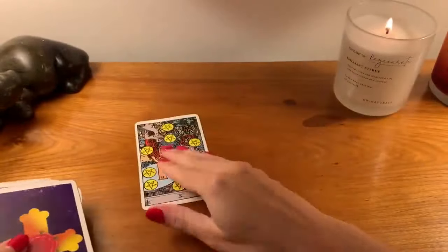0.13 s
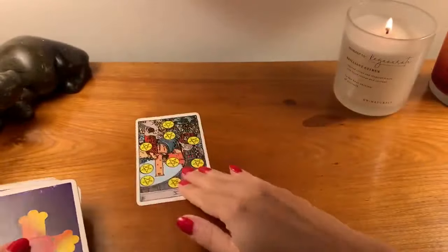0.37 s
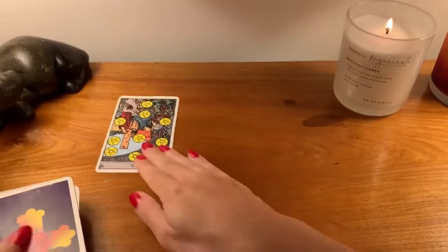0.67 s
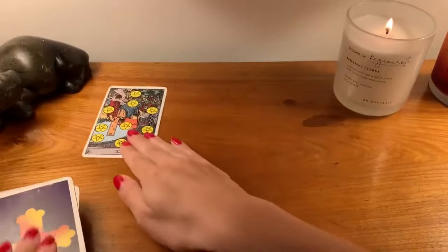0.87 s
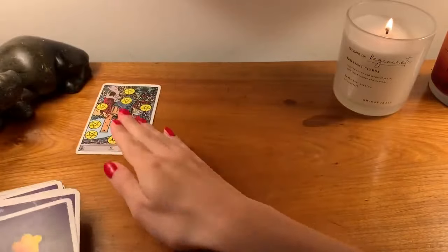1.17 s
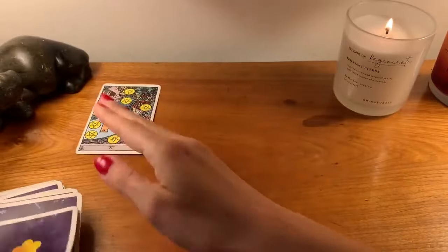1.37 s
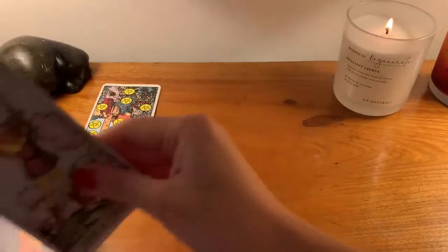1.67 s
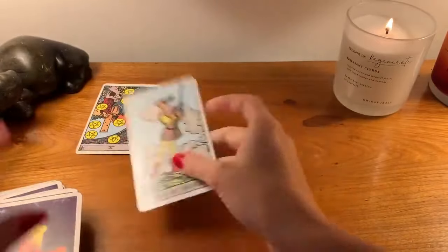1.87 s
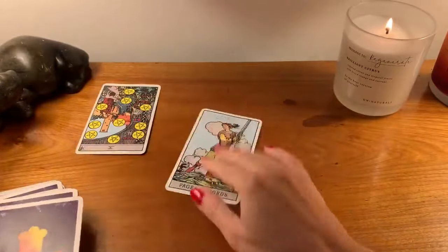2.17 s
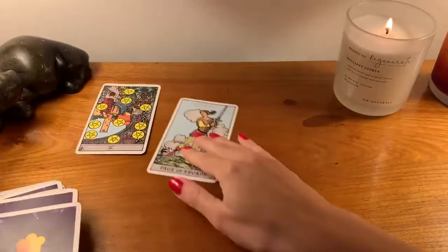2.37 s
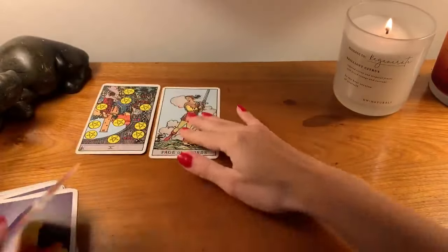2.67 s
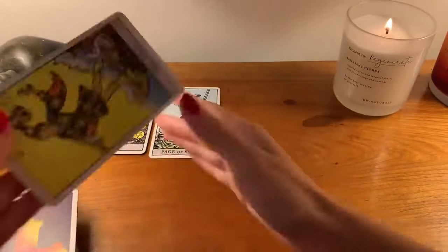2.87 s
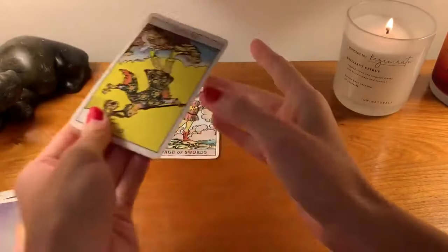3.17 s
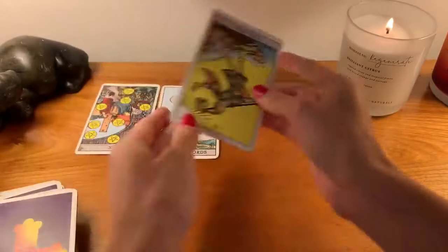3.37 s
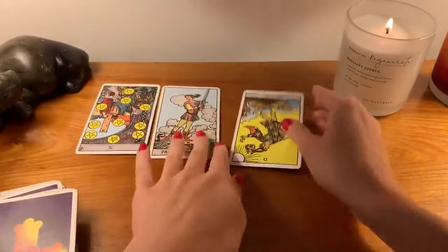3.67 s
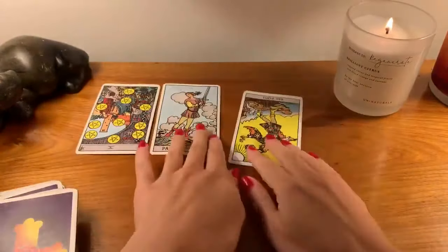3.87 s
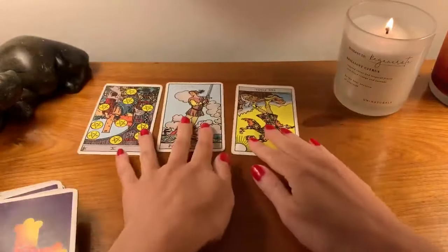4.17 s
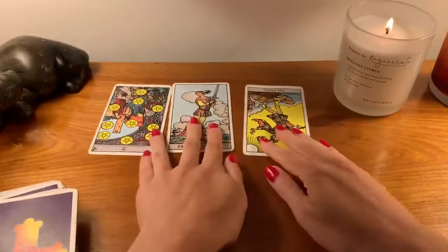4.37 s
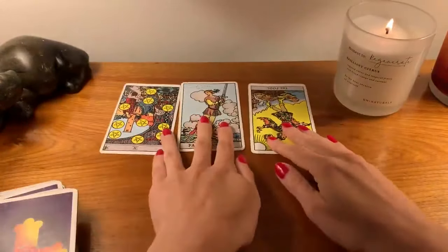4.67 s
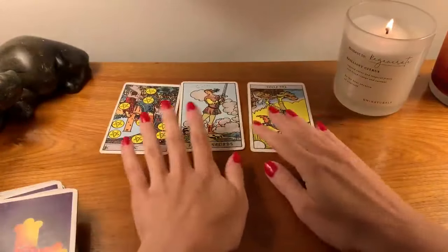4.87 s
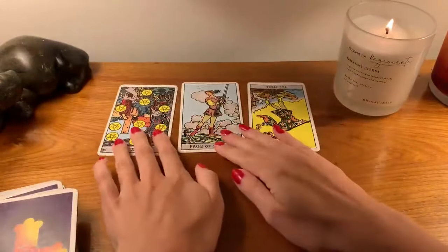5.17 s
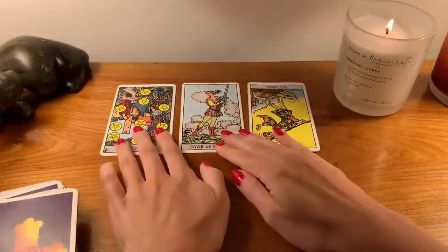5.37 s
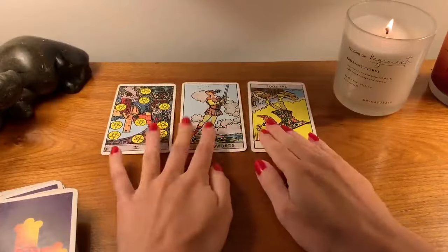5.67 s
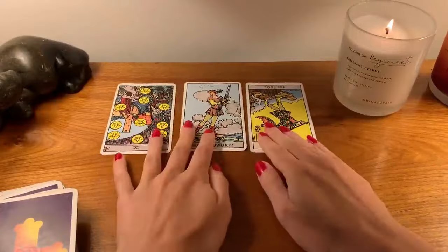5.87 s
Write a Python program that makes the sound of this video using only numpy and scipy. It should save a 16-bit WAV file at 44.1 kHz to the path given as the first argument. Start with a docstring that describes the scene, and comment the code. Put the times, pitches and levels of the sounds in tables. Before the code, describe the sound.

Close, dry card flicks and swishes over wood, one deep knock early on, then quiet fingertip rubbing and faint rumbles in a hushed room.

```python
"""Cards pushed on a wooden table

Three cards are drawn from a deck, laid on a wooden table and pushed into line by fingertips, near a phone.
Friction noise in three bands makes the scrapes and a narrow whistle; noise bursts make the edge snaps,
and short decaying tones the ticks. Damped modes of the table boom under blows and rumble under dragging
skin, which also judders; hiss and a deep hum lie below. The phone hears the air through two ports."""
import sys
import numpy as np
from scipy import signal
from scipy.fft import rfft, irfft
from scipy.io import wavfile
from scipy.ndimage import uniform_filter1d

SR = 44100
rng = np.random.default_rng(int(sys.argv[2]) if len(sys.argv) > 2 else 0)


def master_out(mix):
    """Clip the mix to full scale and print it as 16-bit PCM to the path in sys.argv[1]."""
    frames = np.transpose(np.atleast_2d(mix))
    ceiling = np.clip(frames, -1, 1)
    pcm = np.round(ceiling * 32767).astype(np.int16)
    wavfile.write(sys.argv[1], SR, pcm)


N = 265482

# Room hiss, shape of its spectrum: (frequency [Hz], relative level [dB])
ROOM_SPECTRUM = [(120, -28), (200, 1), (422, 2), (575, -8), (1280, -10.5), (2960, -12), (11800, -19.5),
                 (13200, -13), (14200, -18), (15800, -37)]
# Table top modes: (frequency [Hz], level [dB], undamped decay time t60 [s])
TABLE_MODES = [(57.6, -2.5, 0.056), (89.8, -4, 0.41), (105.7, -3.5, 0.33), (136.5, -6, 0.13),
               (176.7, -15.5, 0.36), (204.8, 10, 0.029), (252, -1, 0.082), (289.8, -9, 0.1),
               (326, -15.5, 0.188), (398.7, -18, 0.38), (546, -19, 0.23)]
# Fingers dragging on wood: (fastest at [s], speeding up [s], slowing down [s], low modes level [dB],
# middle modes over low [dB], high modes over low [dB])
DRAGS = [(.05, 0.2, 0.13, -62, 0.5, -1), (.22, 0.16, 0.43, -62, -6, 1), (.4, 0.11, 0.2, -56, -16, -4),
         (.75, 0.47, 0.085, -51, -2, -16), (1.05, 1, 0.075, -69, -3, 1), (1.27, 0.11, 0.031, -70.5, 3, 3.5),
         (1.52, 0.47, 0.21, -72.5, 3.5, 0), (1.8, 0.22, 0.068, -53.5, -0.5, 0),
         (2.05, 0.29, 0.4, -67.5, -0.5, 4.5), (2.42, 0.26, 0.053, -54.5, -5.5, -5.5),
         (2.62, 0.23, 0.18, -60.5, -15, -18), (2.89, 0.08, 0.11, -56, -11, -18),
         (3.1, 0.09, 0.11, -73, -7, -24), (3.43, 0.078, 0.028, -59, -7, -4),
         (3.69, 0.22, 0.3, -57.5, -10.5, -11.5), (4.15, 0.2, 0.33, -59, -6.5, -9.5),
         (4.52, 0.2, 0.34, -51, -6.5, -11.5), (5.05, 0.41, 0.8, -55, -6.5, -8.5),
         (5.6, 0.1, 0.22, -52, -3, -37), (5.8, 0.18, 0.2, -54, -8, -30)]
# Tremble of still hands: level on the low, middle and high modes [dB]
RESTING_DB = (-69.5, -81, -81)
# Skin slipping regularly: (slip rate [1/s], strongest at [s], swelling [s], fading [s],
# 2nd multiple level [dB], 1st over 2nd [dB], 3rd over 2nd [dB], 4th over 2nd [dB])
JUDDERS = [(84.8, 4.53, 0.082, 0.088, -46, -10.5, -11, -17.5), (63.1, 5.76, .15, 0.11, -51, -10, -4.5, -30)]
# Blows on the table: (time [s], peak [dB], push length [ms], damping by the hand [1 = free],
# tilt towards high modes [dB per octave], travel time of a 100 Hz bending wave [ms])
THUMPS = [(0.146, -35.5, 2.6, 3.9, 10, 6.1), (0.342, -44, 4.6, 1.2, 0, 5.8),
          (0.5521, -19.5, 3.9, 1.13, 5, 10), (0.622, -33, 4.15, 1.8, -1, 7.5),
          (1.682, -33, 1.6, 2.4, 6.5, 7.6), (1.906, -49, 3.1, 3, 6, 6), (2.262, -28, 1.97, 0.87, -1.5, 6),
          (2.857, -48, 7.6, 0.58, 8, 4.4), (3.645, -46, 4.4, 0.81, 2.5, 8.8),
          (3.910, -27.5, 3.9, 5, 1, 16.54), (4.1, -45, 6.5, 0.84, -2, 5.9), (4.357, -39, 22, 2.6, 15, 5.3),
          (4.471, -44, 5, 1.1, 0, 8.4), (5.541, -42, 6.4, 1.4, 7, 8.8)]
# Nails and bent cards ringing: (time [s], level [dB], pitch [Hz], decay time t60 [s])
TICKS = [(3.377, -47.5, 950, 0.025), (3.382, -55, 1230, .025), (3.398, -66, 1100, 0.043),
         (3.413, -53.5, 1284, 0.082), (3.419, -56, 1125, 0.029), (3.802, -65, 4120, 0.017),
         (3.859, -49, 3960, 0.01), (3.903, -69, 3620, 0.084), (4.109, -63, 1070, 0.025),
         (4.177, -56.5, 4200, 0.015), (5.92, -64.5, 6780, 0.022)]
# Card edges snapping: (time [s], treble peak before colouring [dB], middle over treble [dB],
# low over treble [dB], decay time t60 [s])
SNAPS = [(0.0391, -41, -4, 5.5, 0.016), (.053, -49.5, 3, 6.5, 0.023), (.09, -50, 0, 5, .02),
         (.069, -48, 0, 11, 0.017), (0.077, -42.5, 1, 7, 0.015), (0.104, -41, -13, -7, 0.018),
         (0.139, -39, -4, -14, 0.027), (0.3376, -36, -12, -15.5, 0.021), (0.347, -54, -25, -1, 0.037),
         (0.408, -51, -33, -31, 0.027), (0.5487, -24.5, 0, -3.5, 0.023), (1.648, -41, -0.5, 3.5, 0.0087),
         (1.678, -38, 0, 4, 0.047), (1.6872, -35, 2, -30, 0.015), (1.71, -48.5, 4, 2, 0.024),
         (1.768, -45, 3, -8, .015), (1.995, -39.5, -6, 2, 0.04), (2.0859, -43.5, -29, 9.5, 0.022),
         (2.118, -52, 4.5, 7.5, 0.075), (2.156, -44, -33, 1.5, 0.011), (2.1726, -39, -11, -12, 0.04),
         (2.1862, -48, -5, -17, 0.039), (2.256, -31.5, 2.5, -7, 0.034), (2.2592, -25.5, -15, -5.5, 0.034),
         (2.328, -37.5, -30, -35, 0.015), (2.372, -42, -30, -35, .01), (2.379, -31, -30, -35, .012),
         (2.43, -38, -38, -27, 0.03), (2.4558, -29, -30, -25, .016), (2.582, -37.5, -42, -42, 0.049),
         (2.638, -47.5, -34, -37, 0.028), (3.377, -54, -8, 5, 0.033), (3.42, -51.5, -8, 11, 0.036),
         (3.6112, -45, 4.5, 10.5, 0.011), (3.7332, -43.5, -7.5, -18, 0.056), (3.936, -52.5, -3, -8, 0.054),
         (3.958, -40.5, -8, -29, 0.014), (4.053, -36, -22, -30, 0.017), (4.56, -59.5, -25, -22, 0.072),
         (5.046, -48, -9, -12, 0.065), (5.185, -60, -2.5, -10, 0.064), (5.771, -43, -7, -10, 0.02),
         (5.7847, -40, -39, -28, 0.028)]
# Ring of a snapping edge: (frequency [Hz], gain [dB])
EDGE_RING = [(2600, -5.5), (3300, -1), (4000, -2.5)]
# Low, middle and treble band of card noise: (lower edge [Hz], upper edge [Hz])
SCRAPE_BANDS = [(550, 1880), (2300, 5560), (5400, 12830)]
# Strokes of a card over card or wood: (fastest at [s], speeding up [s], slowing down [s],
# treble hiss before colouring [dB], middle over treble [dB], low over treble [dB])
SLIDES = [(.125, 0.087, .03, -50, -5, -13), (0.141, 0.014, 0.015, -36.5, -7, -13.5),
          (.17, 0.045, 0.11, -61, 1, -7.5), (.5, 0.12, 0.5, -64, -11, -18),
          (.62, 0.31, 0.15, -60, -11.5, -10), (.78, 0.33, 0.18, -59.5, -22, -26.5),
          (.92, 0.31, 0.23, -64, -15, -16.5), (1.02, 0.2, 0.084, -67.5, -15, -11),
          (1.1, 0.075, 0.041, -71.5, -15, -13), (1.245, 0.048, 0.034, -57, -9, -11),
          (1.451, 0.37, 0.14, -62.5, -9.5, -14.5), (1.591, 0.044, 0.033, -60, 1.5, -9.5),
          (1.775, 0.053, 0.038, -49, 0, -4.5), (1.86, 0.13, 0.13, -64, -11, -11),
          (1.915, 0.024, 0.018, -55.5, -9, -2.5), (1.97, 0.09, 0.047, -75.5, -10, -2),
          (2.04, 0.071, 0.14, -69.5, 1.5, 0.5), (2.3, 0.072, 0.07, -63, 4, -3),
          (2.37, 0.075, 0.27, -54.5, -19, -16.5), (2.462, 0.018, 0.022, -48, -40, -28),
          (2.476, 0.011, .012, -46, -32, -26), (2.485, 0.023, 0.027, -41.5, -42, -32),
          (2.52, 0.18, 0.17, -53, -55, -32), (2.649, 0.12, 0.09, -51.5, -28, -25.5),
          (2.69, 0.034, 0.044, -55.5, -25, -22), (2.815, 0.071, 0.029, -62.5, -14, -18),
          (3.331, 0.0067, 0.012, -71, 0.5, 2.5), (3.409, 0.074, 0.062, -67, -6, -2.5),
          (3.54, 0.028, 0.03, -76.5, -0.5, -9), (3.69, 0.081, 0.041, -61, -7.5, -10),
          (3.748, 0.028, 0.037, -68, 2, -1.5), (4.0, 0.2, 0.53, -65.5, -7, -22),
          (4.12, 0.28, 0.13, -62, -17, -24), (4.44, 0.22, 0.11, -62.5, -13, -21),
          (4.52, 0.14, 0.094, -75, 2, 12.5), (4.54, 0.065, 0.16, -74, -20, -18),
          (4.77, 0.034, .05, -77.5, -7.5, -4), (4.91, 0.11, 0.14, -64, -4, -13),
          (5.0, .12, 0.16, -64.5, -11, -26), (5.06, 0.23, 0.11, -64, -3.5, -12),
          (5.67, 0.12, 0.14, -66.5, -0.5, -6), (5.79, 0.037, 0.041, -81, 9.5, 9.5)]
# Air whistling under a sliding card: (fastest at [s], speeding up [s], slowing down [s],
# level before colouring [dB])
WHISTLES = [(4.0, 0.045, 0.72, -77.5), (4.95, 0.23, 0.18, -73), (5.1, 0.18, .07, -76)]
# Colour of card stock: (frequency [Hz], gain [dB])
CARD_COLOUR = [(600, -1), (2200, -1), (3300, 2.5), (4800, -5), (7500, 1), (10000, 1), (12000, 0),
               (13500, 3.5), (15000, 2)]
# Scatter at the ports: (frequency [Hz], scattered over direct sound [dB])
SCATTER_DB = [(300, 0.5), (700, 2), (6500, 4), (9000, -4.5), (15000, -7)]
# Balance of the ports: (frequency [Hz], left over right [dB])
LEFT_DB = [(300, 2), (900, 1.5), (4300, 1), (6000, -1.5), (9000, 0)]

ROOM_DB = -77.5  # rms of the hiss before the ports
HUM_HZ, HUM_WIDTH_HZ, HUM_DB = 59, 71, -69
UPPER_HZ, HIGH_HZ = 145, 235  # part the low, middle and high table modes
WOOD_HZ = 464  # rumble is low-passed here
EDGE_DB = -18  # level at either end of a stroke, against its fastest moment
SLIDE_POWER, DRAG_POWER, JUDDER_POWER = 1.29, 1.5, 3  # 1 = pointed stroke, 2 = bell, more = flat top
JUDDER_WOBBLE = .05  # share by which the slip rate wanders
CREST_DB = 5.5  # peak over rms of a burst
TAIL_DB, TAIL_T60_S = -19.5, 0.22  # room tail of a snap
CATCH_PER_S, CATCH_DB = 150, 1  # fibres that catch and let go: how often, gain added by the strongest
CATCH_DECAY_S = 0.00017  # time constant
GRAIN_DB, STUTTER_DB, BAND_FLICKER_DB = 1.6, .8, .9  # quick grain, slower surges, wavering of each band
PATCH_DB, PATCH_PER_S = 1.8, 32  # how far and how often narrow bands of the scrape waver
WHISTLE_HZ, WHISTLE_WIDTH_HZ = 1570, 190
PORT_LAG_MS, FLIP_HZ = .345, 700  # lateness of the left port, centre of its phase reversal
WOOD_SIDE_DB = -15.5  # opposite shake of the two ports, against the common shake
UNLIKE_DB, SWAY_LAG_S = -4, .023  # late part of the opposite shake
LOW_HZ, TOP_HZ = 42.7, 15650  # limits of the phone


def undb(db):
    """Amplitude ratio of a level in decibels."""
    return 10 ** (np.asarray(db) / 20)


def unit(x):
    """Normalisation to an rms of 1."""
    return x / np.sqrt(np.mean(x ** 2))


def decay(t, t60):
    """Exponential decay: 60 dB in t60 seconds."""
    return np.exp(-np.log(1000) * t / t60)


def band(x, hz, width):
    """Band-pass resonance, applied twice for steep skirts."""
    b, a = signal.iirpeak(min(hz, .45 * SR), hz / width, SR)
    return signal.lfilter(b, a, signal.lfilter(b, a, x))


def ring(x, hz, t60):
    """Damped mode: a complex one-pole resonator driven by a force."""
    pole = np.exp((2j * np.pi * hz - np.log(1000) / t60) / SR)
    return signal.lfilter([1], [1, -pole], x).imag


def butter(kind, hz):
    """Third-order Butterworth filter, maximally flat in its pass band."""
    return signal.butter(3, hz, kind, fs=SR, output="sos")


def walk(rate):
    """Slow random modulation: levels drawn `rate` times a second and slewed; spread near 1."""
    hold = int(SR / rate)
    steps = np.repeat(rng.standard_normal(N // hold + 1), hold)
    return uniform_filter1d(steps, hold)[:N] * 1.2


def add(out, s, x):
    """Superposition of a sound on the others from time s onwards."""
    i = int(s * SR)
    out[..., i:i + x.shape[-1]] += x[..., :N - i]


def over_hz(table):
    """Spectrum level at every bin: (Hz, dB) points joined over log frequency."""
    at, db = np.transpose(table)
    return np.interp(np.log(np.arange(1, N // 2 + 2) * SR / N), np.log(at), db)


def shaped(x, table):
    """Zero-phase filtering by (Hz, dB) points."""
    return irfft(rfft(x) * undb(over_hz(table)), N)


def scrape_bands(x):
    """Low, middle and treble part of a noise, each of rms 1; zero phase, so overlaps do not cancel."""
    n = x.shape[-1]
    hz = np.fft.rfftfreq(n, 1 / SR)
    gains = [np.abs(signal.sosfreqz(butter("bandpass", edges), hz, fs=SR)[1]) for edges in SCRAPE_BANDS]
    return [unit(irfft(rfft(x) * gain, n)) for gain in gains]


def strokes(table, power):
    """Friction follows speed: each stroke swells and fades; one gain per band, strokes add in power."""
    s, rise, fall, db, *share_db = np.transpose(table)[..., None]
    t = np.arange(0, N + 64, 64) / SR
    away = np.abs(t - s) / np.maximum(np.where(t < s, rise, fall), .005)
    level = db + EDGE_DB * away ** power
    powers = [np.sum(undb(level + share) ** 2, axis=0) for share in [0, *share_db]]
    return np.array([np.interp(np.arange(N) / SR, t, np.sqrt(p)) for p in powers])


def room_hiss():
    """Stationary noise with a fixed spectrum; row 0 is direct, rows 1 and 2 scatter to each port."""
    return undb(ROOM_DB) * unit(shaped(rng.standard_normal((3, N)), ROOM_SPECTRUM))


def hum():
    """Broad resonance of noise: the building's deep rumble, carried by the table."""
    return undb(HUM_DB) * unit(band(rng.standard_normal(N), HUM_HZ, HUM_WIDTH_HZ))


def rumble():
    """Stick and slip: the random force of dragging skin drives table modes broadened by the hand."""
    force = rng.standard_normal(N) * undb(2.0 * walk(25))
    groups = np.zeros((3, N))
    for hz, db, _ in TABLE_MODES:
        group = int(hz > UPPER_HZ) + int(hz > HIGH_HZ)
        groups[group] += undb(db) * band(force, hz, hz / 3.97)
    gains = np.hypot(strokes(DRAGS, DRAG_POWER), undb(RESTING_DB)[:, None])
    return sum(gain * unit(x) for gain, x in zip(gains, groups))


def judder():
    """Periodic stick and slip: nearly even slips make the wood hum on multiples of their rate."""
    out = 0
    for rate, *stroke in JUDDERS:
        turns = np.cumsum(rate * (1 + JUDDER_WOBBLE * walk(30))) / SR
        for gain, multiple in zip(strokes([stroke], JUDDER_POWER), (2, 1, 3, 4)):
            tone = np.sqrt(2) * np.sin(2 * np.pi * (multiple * turns + rng.random()))
            out = out + gain * undb(2 * walk(40)) * tone
    return out


def thumps():
    """Modal excitation and dispersion: a soft push rings the table, high modes first; a hand damps it."""
    out, t = np.zeros(N), np.arange(SR) / SR
    spreads = rng.standard_normal((len(THUMPS), len(TABLE_MODES)))
    for (s, db, push_ms, damp, tilt_db, travel_ms), spread in zip(THUMPS, spreads):
        boom = 0
        for (hz, mode_db, t60), chance in zip(TABLE_MODES, spread):
            # bending waves travel as the root of frequency; lateness counts from a 400 Hz wave
            late_ms = travel_ms * (np.sqrt(100 / hz) - .5)
            push = np.sin(np.pi * np.clip((1000 * t - late_ms) / push_ms, 0, 1)) ** 2
            # each spot on the table drives the modes a little differently
            drive = undb(mode_db + tilt_db * np.log2(hz / 100) + 1.1 * chance)
            boom = boom + drive * ring(np.gradient(push), hz, t60 / max(damp, .3)) / hz
        add(out, s, undb(db) * boom / np.abs(boom).max())
    return out


def ticks():
    """Free vibration: one short rough mode each, nearly alike at both ports."""
    out, t = np.zeros((2, N)), np.arange(SR // 4) / SR
    for (s, db, hz, t60), noise in zip(TICKS, rng.standard_normal((len(TICKS), 2, len(t)))):
        tone = np.sin(2 * np.pi * hz * t + .5 * noise[:, :1])  # a random phase at each port
        rough = 0.3 * unit(band(noise, hz, hz / 2.5))
        add(out, s, undb(db) * (tone + rough) * decay(t, t60) * np.minimum(t / 0.0007, 1))
    return out


def snaps():
    """Impulsive release: each edge gives a sharp noise burst with a faint room tail; rows as in the hiss."""
    out, t = np.zeros((3, N)), np.arange(SR // 4) / SR
    tail = undb(TAIL_DB) * decay(t, TAIL_T60_S)
    noises = rng.standard_normal((len(SNAPS), 3, len(t)))
    for (s, db, mid_db, low_db, t60), noise in zip(SNAPS, noises):
        shape = (decay(t, max(t60, .004)) + tail) * np.minimum(t / 0.0017, 1)
        low, mid, high = scrape_bands(noise)
        burst = high + undb(mid_db) * mid + undb(low_db) * low
        add(out, s, undb(db - CREST_DB) * shape * burst)
    return shaped(out, EDGE_RING)


def whistle(noise):
    """Narrow resonance of air under a sliding card, excited by noise and swelling with speed."""
    tone = unit(band(noise, WHISTLE_HZ, WHISTLE_WIDTH_HZ))
    return strokes(WHISTLES, SLIDE_POWER) * undb(2 * walk(20)) * tone


def catches():
    """Random micro-impacts: fibres catch and let go, each a brief decaying rise in gain."""
    chance = rng.random((2, N))
    hits = (chance[0] < CATCH_PER_S / SR) * chance[1] ** 2 * undb(CATCH_DB)
    return signal.lfilter([1], [1, -np.exp(-1 / (CATCH_DECAY_S * SR))], hits)


def slide():
    """Friction noise: a card catching on grain gives stuttering noise; rows as in the hiss."""
    noise = rng.standard_normal((3, N))
    # the bending card favours now one narrow band, now another
    patchy = 0
    for k, hz in enumerate(np.geomspace(600, 16500, 15)):
        patchy = patchy + (-1) ** k * undb(PATCH_DB * walk(PATCH_PER_S)) * band(noise, hz, hz / 3)
    grain = undb(GRAIN_DB * walk(300) + STUTTER_DB * walk(47)) * (1 + catches())
    low, mid, high = scrape_bands(patchy * grain)
    gains = strokes(SLIDES, SLIDE_POWER)
    scrape = sum(g * undb(BAND_FLICKER_DB * walk(27)) * x for g, x in zip(gains, (high, mid, low)))
    return scrape + whistle(noise)


def ports(air):
    """Delay and phase: the left port hears direct sound later and, above the bass, inverted; scatter differs."""
    hz = np.arange(N // 2 + 1) * SR / N
    turn = 2 * np.pi * hz * PORT_LAG_MS / 1000 - np.pi * hz ** 2 / (hz ** 2 + FLIP_HZ ** 2)
    direct, *scatter = rfft(air)
    share = undb(over_hz(SCATTER_DB))
    pair = np.array([direct * np.exp(-1j * turn), direct])
    both = (pair + share * np.array(scatter)) / np.hypot(1, share)  # direct and scatter add in power
    balance = undb(over_hz(LEFT_DB) * np.array([[.5], [-.5]]))
    return irfft(both * balance, N)


def shake(wood):
    """Structure-borne sound: wood shakes both ports almost alike, and the phone rocks a little, late."""
    late = undb(UNLIKE_DB) * np.roll(wood, int(SWAY_LAG_S * SR))
    side = signal.hilbert(wood).imag + late  # a quarter turn off, plus the late rocking
    return wood + undb(WOOD_SIDE_DB) * np.array([[1], [-1]]) * side


def scene():
    """Superposition of airborne sound through the ports, ticks, and sound carried by the wood."""
    rumbling = signal.sosfilt(butter("lowpass", WOOD_HZ), rumble() + hum())
    wood = thumps() + judder() + rumbling
    cards = shaped(slide() + snaps(), CARD_COLOUR)
    return ports(cards + room_hiss()) + ticks() + shake(wood)


def record(dry):
    """Band limiting: the phone thins the deepest bass and cuts the top."""
    thin = signal.sosfilt(butter("highpass", LOW_HZ), dry)
    return signal.sosfilt(signal.ellip(10, .2, 80, TOP_HZ, fs=SR, output="sos"), thin)


dry = scene()
out = record(dry)
master_out(out)
```